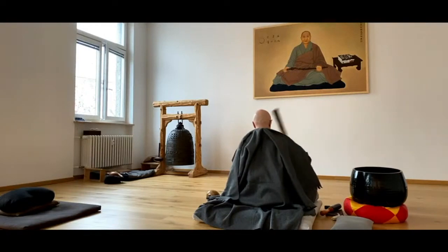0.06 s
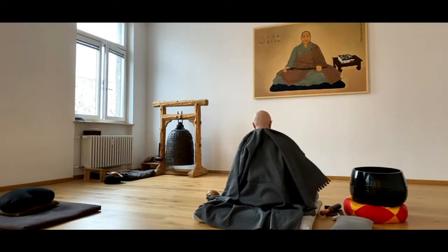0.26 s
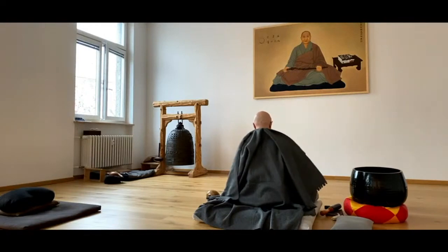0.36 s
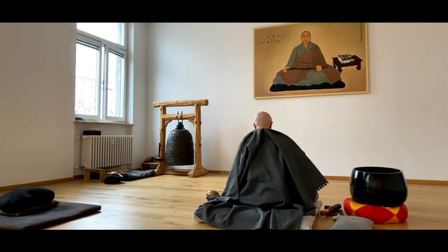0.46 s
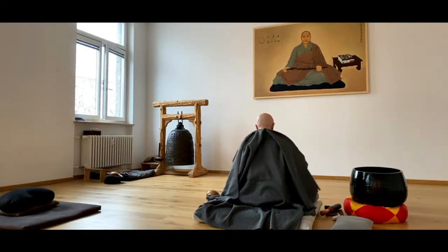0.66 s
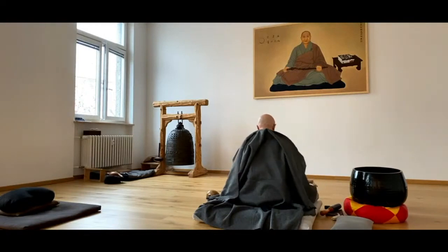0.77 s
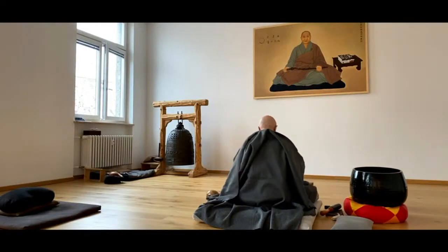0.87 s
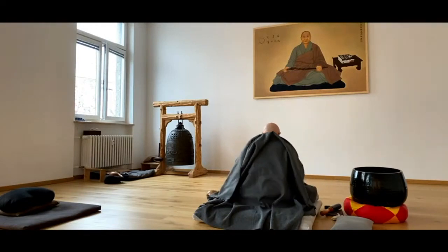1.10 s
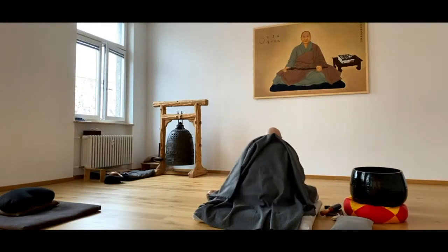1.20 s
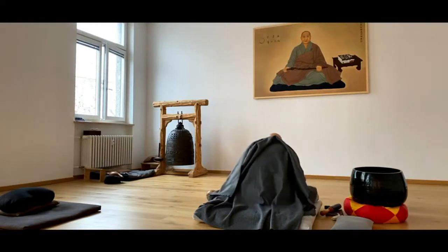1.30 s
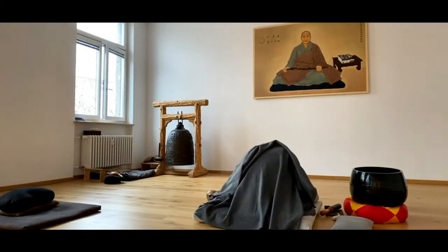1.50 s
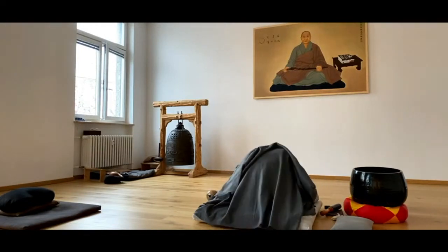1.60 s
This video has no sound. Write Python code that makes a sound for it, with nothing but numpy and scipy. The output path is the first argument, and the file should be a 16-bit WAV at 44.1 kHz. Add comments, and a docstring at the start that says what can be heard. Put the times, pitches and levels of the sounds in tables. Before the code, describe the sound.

A wooden stick slaps a wooden floor once at about 0.2 seconds, a sharp, loud crack with a brief woody ring and a low thump. Quick reflections follow, then a bright echo fades through the large, bare room until about 1.5 seconds. Heavy cloth rustles very faintly just before the strike and again near 1.6 seconds, over quiet room tone.

```python
"""A wooden stick slaps once onto the floorboards of a large, bare room.
It touches, then lands along its length with a crack; stick and boards ring briefly and the floor thumps.
Ceiling and walls return a few distinct echoes, then a long, bright reverb tail.
Underneath sit a quiet room tone and two faint rustles of heavy cloth."""
import sys
import numpy as np
from scipy import signal
from scipy.fft import irfft
from scipy.io import wavfile

SR = 44100
rng = np.random.default_rng(int(sys.argv[2]) if len(sys.argv) > 2 else 0)


def transcribe(signal):
    """Save signal, clipped to [-1, 1], as a 16-bit WAV file at the path in sys.argv[1]."""
    frames = np.atleast_2d(signal).T
    limited = np.clip(frames, -1, 1)
    pcm = np.round(limited * 32767).astype(np.int16)
    wavfile.write(sys.argv[1], SR, pcm)


N = 72765
RING_START_S = .2160

# modes of stick and boards: pitch_hz, direct_level_db, t60_s, relative_reverb_level_db
WOOD_MODES = [(295, -30, 0.07, -35), (439, -26, 0.086, -39.5), (594, -21, 0.082, -41),
              (778, -16, 0.12, -19.5), (846, -13.5, 0.071, -15), (974.4, -10.5, .045, -31.5),
              (1154, -13, 0.047, -15.5), (1387, -22, .04, -17.5), (1697, -16, 0.057, -14.5),
              (2073, -2.5, 0.043, -11), (2187, -27, .035, -17), (2405, -10, 0.054, -19),
              (5685, -29, 0.037, -40), (5970, -18, 0.039, -39.5)]
# stereo width of all but the room tone: frequency_hz, side_minus_mid_db
STEREO_WIDTH = [(60, -28.5), (300, -23), (700, -39.5), (1300, -39), (2300, -20), (4400, -12), (8000, -4.5),
                (14000, 3)]


def amp(db):
    """Decibels to gain."""
    return 10 ** (np.asarray(db) / 20)


def curve_at(points, hz):
    """Reads a curve on a log-frequency axis."""
    point_hz, value = np.transpose(points)
    return np.interp(np.log(hz + 1), np.log(point_hz + 1), value)


def since(start_s):
    """Seconds since the start, zero before it."""
    return np.maximum(np.arange(N) / SR - start_s, 0)


def decay(t, t60):
    """Falls 60 dB in t60 seconds."""
    return np.exp(-np.log(1000) * t / t60)


def noise(colour, width=STEREO_WIDTH):
    """Stereo noise of rms 1 with random phases; colour maps Hz to relative gain."""
    hz = np.fft.rfftfreq(N, 1 / SR)
    mid, side = np.exp(2j * np.pi * rng.random((2, len(hz)))) * colour(hz)
    side = side * amp(curve_at(width, hz))
    stereo = irfft(np.array([mid + side, mid - side]), N)
    return stereo / np.sqrt(np.mean(stereo ** 2) + 1e-20)


def room_tone(level_db=-69):
    """A steady bed of faint low rumble and hiss."""
    # tone colour: frequency_hz, relative_level_db
    colour = [(20, 1.5), (60, 1), (140, -4.5), (350, -8.5), (600, -12.5), (1000, -18.5), (2300, -21.5),
              (4000, -21.5), (15500, -24)]
    # stereo width, opening toward the top: frequency_hz, side_minus_mid_db
    width = [(60, -22), (240, -17), (950, -19), (3770, -2), (15000, 0.5)]
    return amp(level_db) * noise(lambda hz: amp(curve_at(colour, hz)), width)


def cloth_rustles():
    """Heavy cloth moves softly with the swing and with the bow that follows."""
    # cloth moves: peak_s, half_length_s, level_db
    moves = [(.15, .09, -82), (1.582, 0.01, -71)]
    # muffled cloth colour: frequency_hz, relative_level_db
    colour = [(60, -17.5), (180, -2), (400, -5.5), (550, -11), (720, -2.5), (1000, -3), (1400, -17),
              (8000, -43)]
    envelope = sum(amp(db) * np.exp(-((since(0) - peak) / half) ** 2) for peak, half, db in moves)
    return envelope * noise(lambda hz: amp(curve_at(colour, hz)))


def wood_colour(hz, spread=1.4):
    """The wood's modes as steep-sided resonances: the shorter the ring, the wider the peak."""
    power = sum(amp(db) ** 2 / (1 + ((hz - pitch_hz) * t60 / (2 * spread)) ** 2) ** 2
                for pitch_hz, _, t60, db in WOOD_MODES)
    return np.sqrt(power)


def reverb_tail(wash_db=-25, ring_db=-23.5, predelay_s=0.021, build_s=0.0092):
    """Dense reflections carry the crack and the wood's ring; the treble dies first."""
    # broad wash under the ringing modes: frequency_hz, relative_level_db
    colour = [(50, -24.5), (130, -17), (250, -2), (450, -3), (700, 5.5), (1500, 1), (2450, -1),
              (2850, -12.5), (3650, -10), (4000, -7.5), (6200, -2.5), (8000, -15), (11000, -21.5),
              (13000, -46), (15500, -54.5)]
    # the room's decay times: frequency_hz, t60_s
    decay_times = [(80, .9), (250, 1.715), (550, 1.224), (1200, 1.745), (2100, 1.507), (3000, 1.3),
                   (4300, 1.204), (6000, 0.87), (8000, 0.69), (12000, 0.46)]
    wash = amp(wash_db) * noise(lambda hz: amp(curve_at(colour, hz)))
    ring = amp(ring_db) * noise(wood_colour)
    hz, t, bands = signal.stft(wash + ring, SR, nperseg=512)
    bands = bands * decay(np.maximum(t - RING_START_S, 0), curve_at(decay_times, hz)[:, None])
    tail = signal.istft(bands, SR, nperseg=512)[1][:, :N]
    return tail * np.minimum(since(RING_START_S + predelay_s) / build_s, 1)


def early_echoes(ring, slap_t60_s=0.027):
    """The nearest surfaces each return a short slap and a weaker copy of the ring."""
    # bounces off ceiling and walls: delay_s, ring_gain_db, crack_level_db
    bounces = [(.0165, -13.5, -21), (.0228, -18.5, -21.5), (.0262, -28, -31), (0.0323, -22.5, -21.5)]
    slaps = crack_bursts([(RING_START_S + delay, db, slap_t60_s) for delay, _, db in bounces])
    rings = sum(amp(db) * np.pad(ring, ((0, 0), (round(delay * SR), 0)))[:, :N]
                for delay, db, _ in bounces)
    return slaps + rings


def floor_thump(start_s=.2168, level_db=-12.5, attack_s=0.003, t60_s=.075):
    """The floor gives way and swings back ever more slowly, so its pitch sags as it dies."""
    start_hz, end_hz, sag_s = 145, 10, 0.0095
    t = since(start_s)
    hz = end_hz + (start_hz - end_hz) * np.exp(-t / sag_s)
    swing = -np.sin(2 * np.pi * np.cumsum(hz * (t > 0)) / SR)
    return amp(level_db) * np.minimum(t / attack_s, 1) * decay(t, t60_s) * swing


def wood_ring(attack_s=0.0048, attack_cycles=0.83):
    """Stick and boards ring: the modes swell, the low ones more slowly, and die quickly."""
    t = since(RING_START_S)
    ears = np.array([[-1], [1]])
    ring = np.zeros((2, N))
    for hz, db, t60, _ in WOOD_MODES:
        swell = np.sin(np.pi / 2 * np.minimum(t / (attack_s + attack_cycles / hz), 1)) ** 2
        ear_phase = ears * amp(curve_at(STEREO_WIDTH, hz))  # the high modes sound widest
        ring += amp(db) * swell * decay(t, t60) * np.sin(2 * np.pi * hz * t + ear_phase)
    return ring


def crack_bursts(hits, attack_s=0.00023):
    """Each contact or echo is a sharp, fast-dying burst of noise."""
    # colour of wood striking wood: frequency_hz, relative_level_db
    colour = [(100, -10.5), (500, 2), (1200, 9), (2450, 3.5), (3000, -6), (4500, -5.5), (6500, -1),
              (8200, -11.5), (12000, -23), (13500, -33.5), (15500, -42.5)]
    envelope = sum(amp(db) * np.minimum(since(start) / attack_s, 1) * decay(since(start), t60)
                   for start, db, t60 in hits)
    return envelope * noise(lambda hz: amp(curve_at(colour, hz)))


def stick_crack():
    """The stick touches, then lands along its length: three contacts fuse into one crack."""
    # contacts with the floor: start_s, level_db, t60_s
    contacts = [(.2151, -26, 0.058), (.2171, -16, 0.042), (0.22, -26.5, .022)]
    return crack_bursts(contacts)


def scene():
    """The slap and the room's answer, over cloth and room tone."""
    ring = wood_ring()
    slap = stick_crack() + ring + floor_thump()
    return slap + early_echoes(ring) + reverb_tail() + cloth_rustles() + room_tone()


def record(dry):
    """The recorder softly limits the highest peaks, then cuts the top of the band."""
    knee_db, ceiling_db, cutoff_hz = -4, -1, 15700
    knee = amp(knee_db)
    headroom = amp(ceiling_db) - knee
    below_knee = np.clip(dry, -knee, knee)
    limited = below_knee + headroom * np.tanh((dry - below_knee) / headroom)
    lowpass = signal.firwin(255, cutoff_hz, window=("kaiser", 9), fs=SR)
    return signal.oaconvolve(limited, lowpass[None], "same")


dry = scene()
out = record(dry)
transcribe(out)
```